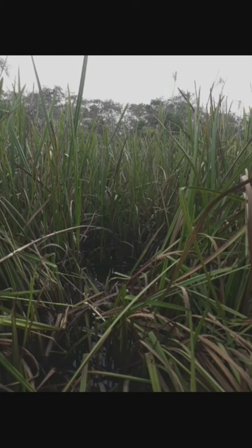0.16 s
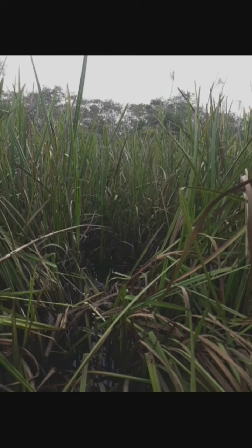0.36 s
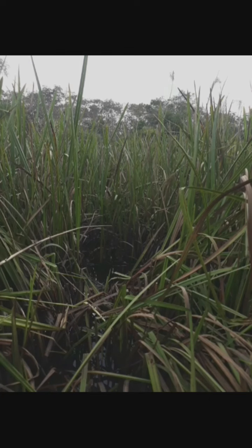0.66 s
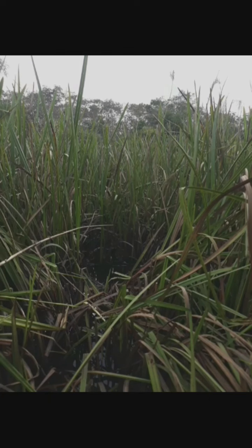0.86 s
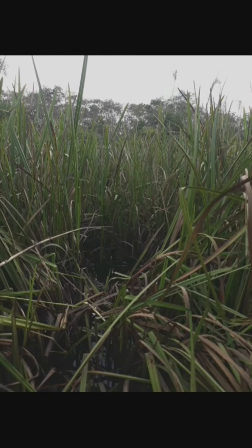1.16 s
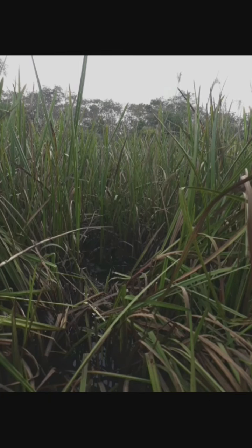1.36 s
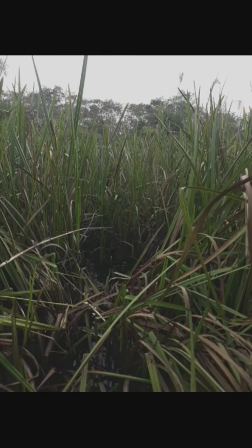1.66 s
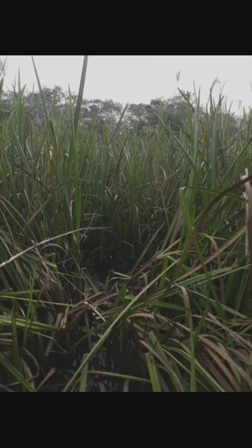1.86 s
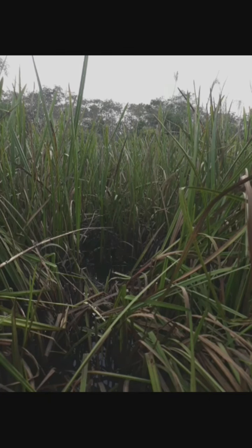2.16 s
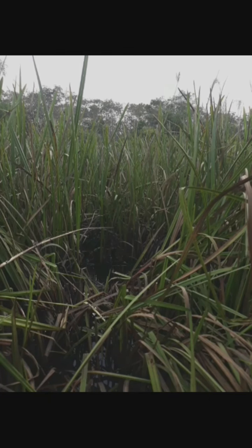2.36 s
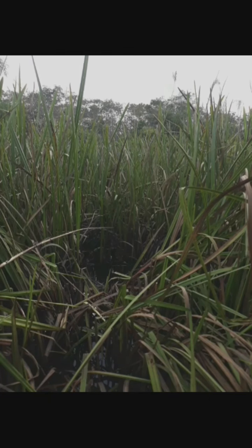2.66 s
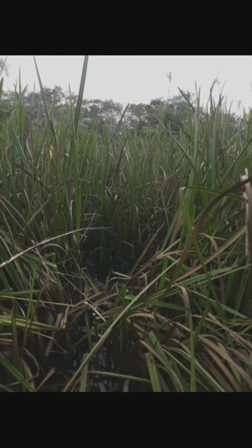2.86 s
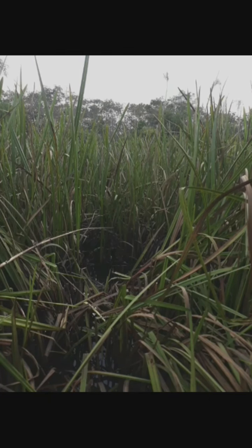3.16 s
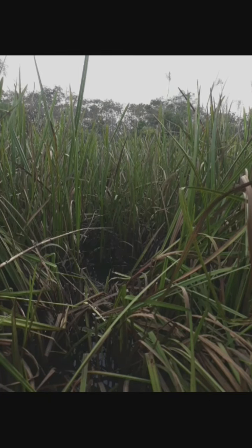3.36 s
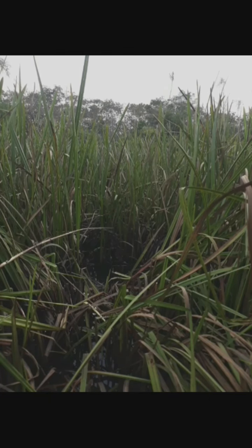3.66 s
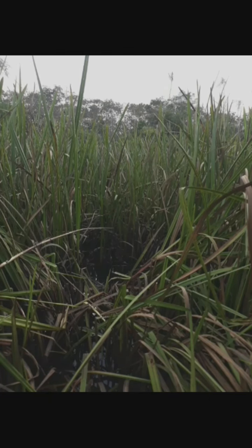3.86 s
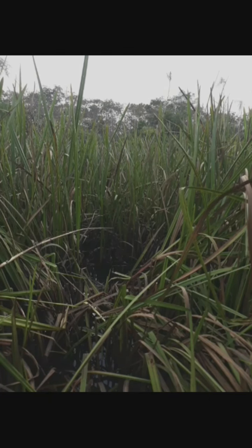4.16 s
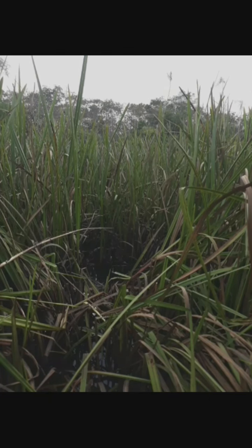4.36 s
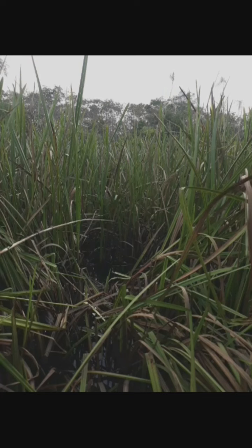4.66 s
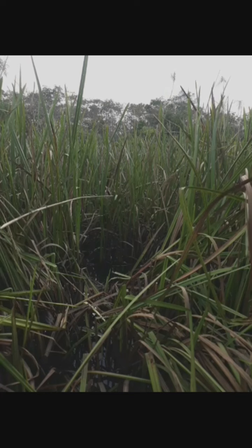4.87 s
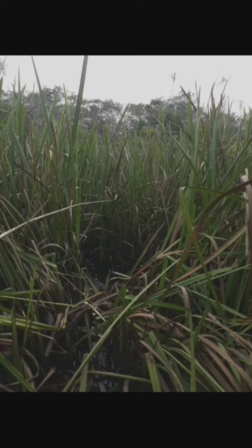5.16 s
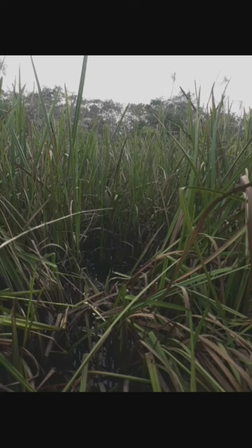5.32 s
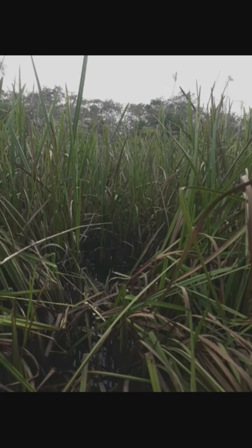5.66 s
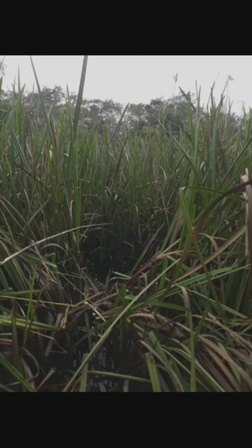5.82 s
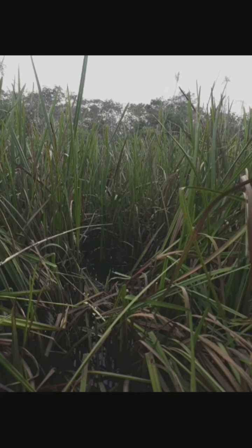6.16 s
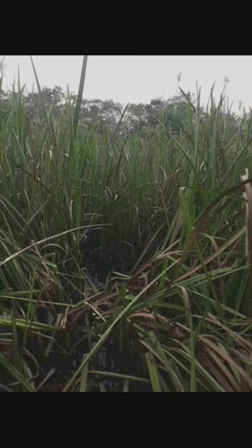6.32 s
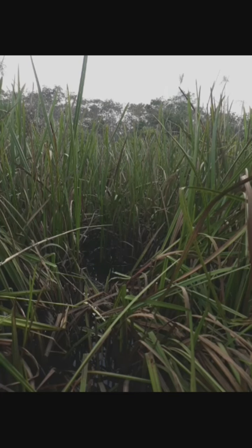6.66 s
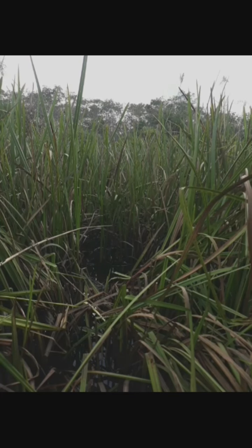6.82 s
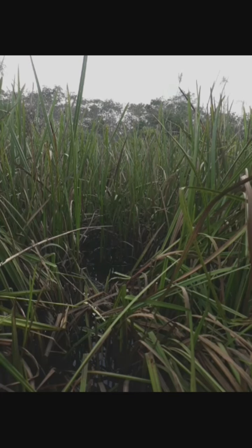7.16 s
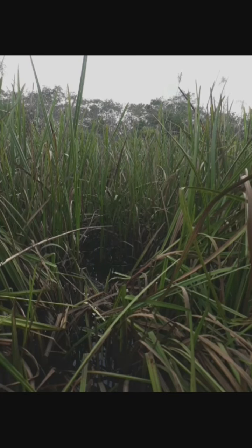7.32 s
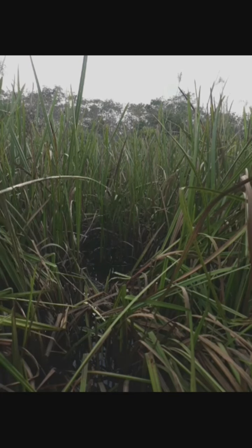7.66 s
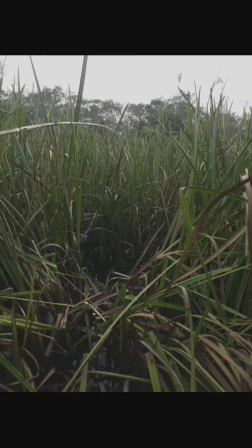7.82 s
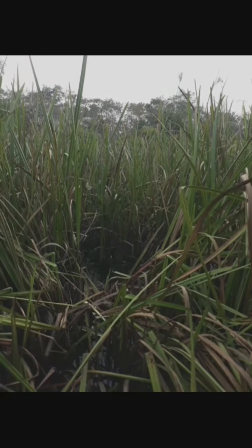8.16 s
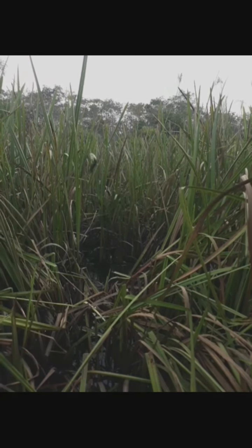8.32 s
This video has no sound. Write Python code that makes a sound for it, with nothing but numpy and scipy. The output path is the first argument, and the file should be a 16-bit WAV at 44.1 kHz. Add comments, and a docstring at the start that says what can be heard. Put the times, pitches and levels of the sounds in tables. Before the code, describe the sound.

Quiet reed marsh with faint distant birds, low rumble and dry stem ticks, then reeds are suddenly pushed aside loudly with a small watery glug.

```python
"""A still reed marsh. From the start, filtered noise gives a low distant rumble, faint air and a thin insect band.
Gliding tones scattered by far trees make birds chirp and trill; dry stems tick as decaying noise bursts.
Close by, long leaves slip free and slide over each other as trains of random friction grains.
At the end the reeds are pushed aside loudly, in three bands of grains with short rings, and the shallow
water glugs as gliding tones of air pockets. Both channels carry the same sound."""
import sys
import numpy as np
from scipy import signal
from scipy.fft import rfft, irfft, next_fast_len
from scipy.io import wavfile

SR = 44100
rng = np.random.default_rng(int(sys.argv[2]) if len(sys.argv) > 2 else 0)


def store_wav(level_fs):
    """Save 16-bit WAV to argv[1]."""
    pcm = np.round(np.clip(np.atleast_2d(level_fs), -1, 1) * 32767)
    wavfile.write(sys.argv[1], SR, pcm.T.astype(np.int16))


N = 374409
TIME = np.arange(N) / SR


def from_db(db):
    """Level definition: decibels to amplitude gain."""
    return 10 ** (np.asarray(db) / 20)


def rms_one(x):
    """Normalisation: scale to unit mean power."""
    return x / np.sqrt(np.mean(x ** 2) + 1e-20)


def add(out, s, sound):
    """Superposition: mix a sound in at a time in seconds, cut at the end of the scene."""
    i = int(s * SR)
    out[i:i + len(sound)] += sound[:N - i]


def colour(x, points):
    """Minimum-phase filtering: the folded cepstrum gives a causal filter with unit power gain."""
    size = 2 * next_fast_len(N // 2 + 4096)
    hz, db = np.transpose(points)
    bin_hz = np.arange(size // 2 + 1) * SR / size
    bin_db = np.interp(np.log(bin_hz + 1), np.log(hz), db)
    cepstrum = irfft(np.log(rms_one(from_db(bin_db))))
    # fold negative time onto positive time
    cepstrum[1:size // 2] *= 2
    cepstrum[size // 2 + 1:] = 0
    response = np.exp(rfft(cepstrum))
    return irfft(rfft(x, size) * response)[:N]


def band(x, low_hz, high_hz, order=2):
    """Band-pass filtering with a maximally flat (Butterworth) passband."""
    sos = signal.butter(order, [low_hz, high_hz], "band", fs=SR, output="sos")
    return signal.sosfilt(sos, x)


def drift(knots_per_s):
    """Random modulation: straight lines between normal random knots, scaled to unit rms."""
    knots = rng.standard_normal(N // 20)
    return rms_one(np.interp(TIME * knots_per_s, np.arange(len(knots)), knots))


def grains(per_s, spread_db):
    """Stick-slip friction: random tiny snaps of uneven size and either sign, at a mean rate per second."""
    sizes = from_db(spread_db * np.minimum(rng.exponential(1, N), 3.6)) * rng.choice([-1, 1], N)
    return rms_one(sizes * (rng.random(N) < per_s / SR))


def swell(start, end, rise, decay):
    """Exponential envelope: grows up to start, holds until end, then decays; rise and decay are time constants."""
    return np.exp(-np.maximum((start - TIME) / rise, (TIME - end) / decay).clip(0, 30))


# effort of the push through the reeds:
# [t/s, nominal level of the leaf band/dB, tilt from stalks to fine crackle/dB]
PUSH_EFFORT = [(7.793, -67, 1), (7.819, -52.5, 2.5), (7.845, -45, 3.5), (7.955, -45, 1), (7.985, -37, 5),
               (8.14, -40, -4.5), (8.24, -44.5, -1), (8.38, -46.5, -2.5), (8.49, -44, -3.5)]
# spectrum of the crumpling grains: [f/Hz, relative density/dB per Hz]
PUSH_SPECTRUM = [(88, -49), (150, -14), (175, -1.5), (315, -7.5), (439, -6.5), (566, -7.5), (790, -3.5),
                 (1040, -4), (1390, -5), (3100, -1), (6910, -3.5), (7770, 1.5), (10000, -11.5), (14800, -6),
                 (16000, -12)]
STALK_DB, FINE_DB = -9, -8.5   # relative to the leaves, at zero tilt


def pushed_reeds():
    """Crackling noise: stalk, leaf and fine bands flutter separately while snaps excite short damped resonances."""
    s, level_db, tilt_db = np.transpose(PUSH_EFFORT)
    effort = from_db(np.interp(TIME, s, level_db)) * (TIME > s[0])
    tilt = np.interp(TIME, s, tilt_db)
    crackle = colour(grains(per_s=4100, spread_db=1.5), PUSH_SPECTRUM)
    parts = [(250, 1540, STALK_DB - tilt), (1880, 7500, 0.011), (9000, 16600, FINE_DB + tilt)]
    crumple = np.zeros(N)
    for low_hz, high_hz, gain_db in parts:
        flutter_db = 1.2 * drift(120)
        crumple += from_db(gain_db + flutter_db) * rms_one(band(crackle, low_hz, high_hz, order=4))
    rings = np.zeros(N)
    for hz in np.geomspace(1800, 7800, 12):
        rings += band(grains(per_s=47, spread_db=3.0), hz, hz + 350, order=1)
    common_flutter = from_db(1.67 * drift(90))
    return effort * (crumple + from_db(-8) * rms_one(rings)) * common_flutter


# air pockets in the shallow water:
# [t/s, initial f/Hz, peak level/dB, length/s, pitch change over the length/share of f]
AIR_POCKETS = [(8.327, 312, -30, 0.047, -0.15), (8.392, 550, -38, 0.021, -0.012),
               (8.393, 277, -43, 0.018, 0.099), (8.407, 1354, -45.5, 0.045, 0.086),
               (8.408, 736, -43.5, 0.051, 0.196), (8.44, 920, -49, 0.023, .1),
               (8.444, 1665, -45, 0.033, 0.032), (8.472, 2117, -43, 0.026, -0.056)]


def bubbles():
    """Bubble resonance: a strong low glug, then weaker air pockets, most of them smaller and higher."""
    out = np.zeros(N)
    for s, hz, db, length, glide in AIR_POCKETS:
        u = np.linspace(0, 1, int(length * SR))
        envelope = np.sin(np.pi * u ** 0.52)   # peaks in the first third
        phase = 2 * np.pi * np.cumsum(hz * (1 + glide * u)) / SR
        add(out, s, from_db(db) * envelope * np.sin(phase))
    return out


# leaves slipping free: [t/s of the peak, rms level at the peak/dB, decay time constant/s, blade f/Hz]
SLIPS = [(0.31, -38, 0.0071, 7200), (0.321, -37.5, 0.011, 4860), (.615, -55, .017, 5000),
         (1.038, -60, .016, 6611), (1.18, -59.5, 0.022, 4900), (1.465, -61, 0.044, 4900),
         (4.92, -60, .02, 4500), (5.135, -58, 0.024, 4000), (7.665, -54, .013, 6500),
         (7.688, -47, 0.013, 4000), (7.836, -47.5, 0.043, 3800), (7.966, -32.5, 0.011, 2960),
         (7.995, -32, 0.01, 6000), (8.025, -42, .014, 6000), (8.070, -31.5, 0.017, 3960),
         (8.112, -34, .0058, 3500), (8.134, -31, 0.0035, 5000), (8.19, -35, 0.019, 1360),
         (8.274, -38.5, 0.012, 3880)]
# spectrum of the broad hiss: [f/Hz, relative density/dB per Hz]
SWISH_SPECTRUM = [(200, -19), (700, -16), (1600, -0.5), (3000, 5.5), (5000, 3.5), (7800, 4.5), (9500, -8),
                  (13000, -2.5), (16000, -11)]
SWISH_RISE_SHARE, BLADE_DB = 0.34, -7.5   # rise as a share of the decay; blade relative to the broad hiss


def swishes():
    """Source and resonator: a leaf slips free in a burst of grains, coloured by the blade's broad resonance."""
    hiss = colour(grains(per_s=12000, spread_db=4.0), SWISH_SPECTRUM)
    out = np.zeros(N)
    for s, db, decay, hz in SLIPS:
        # two thirds of an octave wide
        blade = rms_one(band(hiss, hz / 2 ** (1 / 3), hz * 2 ** (1 / 3)))
        envelope = swell(s, s, SWISH_RISE_SHARE * decay, decay)
        out += from_db(db) * envelope * rms_one(hiss + from_db(BLADE_DB) * blade)
    return out


# snapping stems: [t/s, relative level of the crack/dB, leaf shiver relative to the crack/dB]
STEM_SNAPS = [(0.0772, -52, -5), (0.5485, -39.5, -3.5), (1.1451, -50.5, -3), (1.374, -39.5, -8),
              (1.477, -38.5, -8), (1.6815, -48, -13), (2.0604, -46, -1.5), (2.7633, -40, -8),
              (3.1844, -42, -3), (3.684, -48, 1.5), (3.82, -39.5, -13), (3.9619, -53, -6), (3.982, -46, -3),
              (4.4187, -51, -8), (4.4692, -45, -7), (4.6661, -46, -1.5), (4.9924, -42, -0.5),
              (5.086, -44.5, -1), (5.5605, -46, -6), (5.7655, -46, -16), (6.9384, -49, -13),
              (7.42, -53, -3), (7.7628, -56.5, 5.5)]
# spectrum of a tick: [f/Hz, relative density/dB per Hz]
TICK_SPECTRUM = [(600, -20.5), (1500, -13.5), (3000, -6), (5000, -6), (7500, 1.5), (9500, -16.5),
                 (13000, -12), (16000, -15.5)]
TICK_DB = -8.5   # added to every crack level
TICK_DECAY_S, TICK_TAIL_S = 0.0016, 0.011   # time constants of crack and shiver


def ticks():
    """Impulsive excitation: a dry stem snaps with a sharp crack and a short decaying shiver of its leaf."""
    out, t = np.zeros(N), TIME[:SR // 16]
    for s, db, shiver_db in STEM_SNAPS:
        shape = np.exp(-t / TICK_DECAY_S) + from_db(shiver_db) * np.exp(-t / TICK_TAIL_S)
        add(out, s, from_db(db + TICK_DB) * shape * rng.standard_normal(len(t)))
    return colour(out, TICK_SPECTRUM)


# leaf sliding on leaf: [t/s, length/s, hardest rub/share of the length, nominal level of the hardest rub/dB]
LEAF_SLIDES = [(.37, .45, 0.94, -59), (4.662, 0.3, 0.52, -58), (5.09, 0.54, 0.46, -62.5)]
# spectrum of rubbing leaves: [f/Hz, relative density/dB per Hz]
RUB_SPECTRUM = [(350, -7.5), (600, -18), (919, -23.5), (1610, -10), (2470, -5.5), (2870, -4.5), (4340, 0),
                (5260, -2.5), (7410, -1.5), (9490, -14), (14900, -11.5), (16000, -45)]
SLIDE_ATTACK_S, SLIDE_RELEASE_S = .006, 0.027   # time constants
SLIDE_SWELL_DB, SLIDE_EASE_DB = 8.5, 10.5   # rise before the hardest rub, fall after it


def sliding_leaves():
    """Friction under varying pressure: a fine hiss of grains with coarser catches of toothed blade edges."""
    level = np.zeros(N)
    for s, length, hardest, db in LEAF_SLIDES:
        pressure_db = np.interp((TIME - s) / length, [0, hardest, 1], [-SLIDE_SWELL_DB, 0, -SLIDE_EASE_DB])
        level += from_db(db + pressure_db) * swell(s, s + length, SLIDE_ATTACK_S, SLIDE_RELEASE_S)
    unevenness = from_db(2.2 * drift(55))
    catches = grains(per_s=260, spread_db=3.0)
    rub = grains(per_s=12000, spread_db=2.5) + from_db(-4) * catches
    return level * unevenness * colour(rub, RUB_SPECTRUM)


STIR_PER_S, STIR_DB = 45, -79.5   # mean touches per second; level


def stirring():
    """Random impulses: stems further off touch, each with a tiny exponentially decaying shiver."""
    touches = np.abs(grains(STIR_PER_S, spread_db=2.5))
    decay_per_sample = np.exp(-1 / (0.0023 * SR))   # time constant 2.3 ms
    shiver = signal.lfilter([1], [1, -decay_per_sample], touches + 1e-18)
    noise = rms_one(shiver * rng.standard_normal(N))
    return from_db(STIR_DB) * colour(noise, RUB_SPECTRUM)


def birds():
    """Linear superposition: all the birds share the scattering of the far trees."""
    return woods(trills() + calls())


# runs of trill notes, with pitch and nominal level moving through a turning point:
# [start t/s, turn t/s, end t/s, initial gap/s, gap growth/s per note,
#  (first, turn, last) f/Hz, (first, turn, last) level/dB, octave relative to fundamental/dB]
TRILL_RUNS = [(0.134, .92, 1.28, .0975, .003, (2320, 2360, 2050), (-62.5, -54, -60.5), -28),
              (2.011, 2.115, 2.44, 0.097, -.004, (3100, 2800, 2320), (-72.5, -64.5, -66), -12),
              (5.365, 5.542, 5.84, .099, -.003, (3050, 2690, 2330), (-69.5, -61, -71.5), -4),
              (6.464, 6.612, 6.76, .069, -0.0032, (2650, 2430, 2300), (-65.5, -61.5, -61.5), -21),
              (6.856, 6.93, 7.06, .072, -0.0054, (2320, 2480, 2150), (-59, -63.5, -71.5), -20)]
NOTE_S, NOTE_ARCH, TRILL_RASP = 0.0461, (0.91, 1.02, .92), .07   # length; shares of the note's pitch
NOTE_SCATTER, NOTE_SCATTER_DB = .02, 1.3   # random spread of pitch (share) and level


def trills():
    """Rhythmic repetition: runs of arched notes whose gaps steadily lengthen or shorten."""
    out = np.zeros(N)
    for start, turn, end, gap, growth, pitches, levels_db, octave_db in TRILL_RUNS:
        k = np.arange(16)
        times = start + gap * k + growth * k ** 2 / 2
        for s, (detune, accent) in zip(times, rng.standard_normal((len(k), 2))):
            hz = np.interp(s, [start, turn, end], pitches) * (1 + NOTE_SCATTER * detune)
            db = np.interp(s, [start, turn, end], levels_db) + NOTE_SCATTER_DB * accent
            note = whistle(NOTE_S, hz * np.array(NOTE_ARCH), TRILL_RASP, octave_db)
            if s < end:
                add(out, s, from_db(db) * note)
    return out


# separate bird notes: stray or accented notes of the trill, and calls of other birds:
# [t/s, length/s, middle f/Hz, glide/share of f, nominal level/dB, rasp = pitch flutter/share of f]
SEPARATE_NOTES = [(.01, 0.085, 2240, 0.0084, -68, 0.16), (0.474, 0.09, 941, 0, -68.5, .12),
                  (0.594, 0.15, 1167, -0.04, -70.5, 0.22), (1.128, 0.037, 1958, 0.1, -57.5, 0.04),
                  (1.677, 0.047, 1400, 0.19, -75.5, .21), (1.744, 0.081, 4300, 0.23, -66.5, 0.05),
                  (2.461, 0.027, 2156, 0.01, -61.5, .05), (2.543, .042, 2580, -0.013, -63, .07),
                  (2.641, 0.026, 3570, 0.3, -66, 0.11), (2.78, 0.061, 2350, 0, -74, 0.067),
                  (3.138, 0.12, 3183, 0.08, -65, 0.21), (3.238, 0.11, 3680, 0, -72, 0.2),
                  (3.289, .10, 1175, -0.025, -80, 0.097), (3.5, .14, 5930, -.03, -79, .02),
                  (3.629, 0.057, 3830, -0.016, -72, .07), (3.644, .035, 2455, -0.016, -72, 0.056),
                  (3.84, 0.034, 3500, 0.08, -66.5, 0.042), (3.884, 0.046, 2380, 0.062, -65.5, 0.14),
                  (3.876, 0.16, 4330, 0, -67, 0.084), (4.209, 0.092, 3780, -.03, -70, 0.074),
                  (4.423, 0.08, 3930, .13, -60, 0.031), (4.896, .056, 4580, 0.07, -57.5, 0.075),
                  (4.899, 0.08, 1674, 0.071, -71, 0.18), (5.113, .044, 4460, -.04, -55, .11),
                  (5.103, 0.25, 1517, -0.054, -76.5, 0.153), (5.199, .09, 4600, -.04, -64, .09),
                  (5.221, 0.21, 3390, 0.11, -64, 0.13), (5.818, 0.041, 2210, 0.03, -61.5, 0.044),
                  (5.895, .026, 2580, -.2, -58, 0.029), (6.267, 0.045, 2760, 0.207, -72.5, .06),
                  (6.391, .027, 4900, -.18, -66, .03), (6.421, 0.061, 4090, .12, -60, 0.038),
                  (6.637, 0.051, 2964, -0.12, -64, 0.052), (6.602, 0.18, 4240, -0.058, -71, 0.075),
                  (6.858, 0.087, 4170, -0.2, -67.5, 0.072), (7.099, 0.049, 3800, 0.13, -68.5, .02)]
FAR_CHIRPS_PER_S, FAR_CHIRP_S, FAR_CHIRP_RANGE_HZ = 3, .05, (3600, 5000)
FAR_CHIRP_DB, FAR_CHIRP_RASP = -79.5, .04   # nominal level; flutter as a share of the pitch


def calls():
    """Frequency glides: separate trill notes and other birds' calls, among faint chirps at random times."""
    out = np.zeros(N)
    slope = np.array([-.5, 0, .5])
    for s, length, hz, glide, db, rasp in SEPARATE_NOTES:
        add(out, s, from_db(db) * whistle(length, hz * (1 + glide * slope), rasp, octave_db=-36))
    for when, pitch, glide in rng.random((int(FAR_CHIRPS_PER_S * N / SR), 3)):
        hz = np.interp(pitch, [0, 1], FAR_CHIRP_RANGE_HZ)
        pitches = hz * (1 + 0.28 * (glide - .5) * slope)
        chirp = whistle(FAR_CHIRP_S, pitches, FAR_CHIRP_RASP, octave_db=-36)
        add(out, when * N / SR, from_db(FAR_CHIRP_DB) * chirp)
    return out


FLUTTER_PER_S = 480   # random pitch knots per second


def whistle(length, pitches, rasp, octave_db):
    """Frequency modulation: a gliding sine and its octave, made raspy by fast random pitch flutter."""
    u = np.linspace(0, 1, int(length * SR))
    knots = rng.uniform(-1, 1, 256) * np.sqrt(3)   # unit spread
    flutter = np.interp(u * length * FLUTTER_PER_S, np.arange(256), knots)
    hz = arch(pitches, u) * (1 + rasp * flutter)
    phase = 2 * np.pi * np.cumsum(hz) / SR
    envelope = np.sqrt(2 * np.abs(np.sin(np.pi * u)))
    return envelope * (np.sin(phase) + from_db(octave_db) * np.sin(2 * phase))


def arch(three, u):
    """Quadratic interpolation through a first, middle and last value as u runs from 0 to 1."""
    return np.polyval(np.polyfit([0, .5, 1], three, 2), u)


WOODS_T60_S, WOODS_DB, DIRECT_DB = 0.82, -2, -2   # reverberation time; scattered and direct gain


def woods(x):
    """Multiple scattering: countless trunks and stems turn a far call into a soft decaying tail."""
    t = TIME[:SR]
    decay = from_db(-60 * t / WOODS_T60_S) + 1.6 * np.exp(-t / 0.011)   # late tail and early scatter
    tail = rng.standard_normal(SR) * decay
    scattered = signal.fftconvolve(x, tail / np.linalg.norm(tail))[:N]
    return from_db(DIRECT_DB) * x + from_db(WOODS_DB) * scattered


# spectrum of the distant rumble: [f/Hz, relative density/dB per Hz]
RUMBLE_SPECTRUM = [(12, -45.5), (20, -18), (43, -14), (103, -1), (173, -0.5), (240, -3), (552, -33.5),
                   (700, -52), (910, -72), (1540, -120)]
# slow swell of the far rumble: [t/s, level below the split/dB, level above the split/dB]
RUMBLE_SWELL = [(0.0, -61.5, -60.5), (1.0, -65, -59.5), (4.3, -65, -60), (5.6, -64.5, -56.5),
                (6.8, -71, -58.5), (7.45, -58, -56), (7.8, -67.5, -58.5)]
RUMBLE_SPLIT_HZ = 130.3


def rumble():
    """Band-split noise: the deep and upper parts of the far rumble swell separately."""
    s, deep_db, upper_db = np.transpose(RUMBLE_SWELL)
    far = colour(rng.standard_normal(N), RUMBLE_SPECTRUM)
    deep = signal.sosfiltfilt(signal.butter(3, RUMBLE_SPLIT_HZ, fs=SR, output="sos"), far)
    deep_gain = from_db(np.interp(TIME, s, deep_db))
    upper_gain = from_db(np.interp(TIME, s, upper_db))
    return deep_gain * rms_one(deep) + upper_gain * rms_one(far - deep)


INSECT_HZ, INSECT_WIDTH_HZ, INSECT_DB = 7250, 370, -74.5   # first band-pass; mean level


def insects():
    """Incoherent summation: a chorus merged into noise by two neighbouring band-passes, skirts meeting near 7 kHz."""
    low_hz, high_hz = INSECT_HZ - INSECT_WIDTH_HZ / 2, INSECT_HZ + INSECT_WIDTH_HZ / 2
    chorus = band(rng.standard_normal(N), low_hz, high_hz, order=1)
    return from_db(INSECT_DB + 0.23 * drift(21)) * rms_one(band(chorus, 6450, 7000))


# spectrum of the quiet air: [f/Hz, relative density/dB per Hz]
AIR_SPECTRUM = [(500, -1.5), (800, -1.5), (1500, -6), (2400, -3.5), (3200, -8.5), (4300, 2.5), (5700, -5),
                (6900, -6), (8200, 1), (9000, -14.5), (10300, -15.5), (12500, -5), (15500, -11)]
AIR_DB = -74


def quiet_air():
    """Stationary noise: steady faint air with a fixed spectrum."""
    return from_db(AIR_DB) * colour(rng.standard_normal(N), AIR_SPECTRUM)


def scene():
    """Superposition: all sources sum to one signal, sent alike to both channels."""
    reeds = pushed_reeds() + swishes() + ticks() + sliding_leaves() + stirring()
    background = rumble() + insects() + quiet_air()
    mono = reeds + bubbles() + birds() + background
    return np.array([mono, mono])


CUTOFF_HZ = 15700


def record(dry):
    """Band limitation: a steep elliptic low-pass cuts the top."""
    return signal.sosfilt(signal.ellip(12, .1, 70, CUTOFF_HZ, fs=SR, output="sos"), dry)


dry = scene()
out = record(dry)
store_wav(out)
```